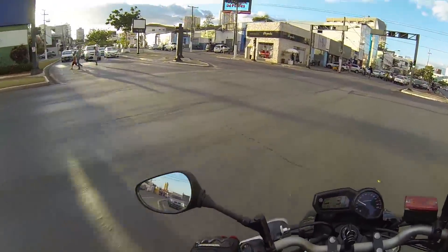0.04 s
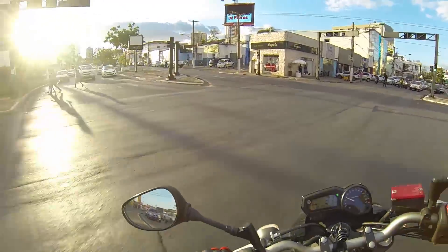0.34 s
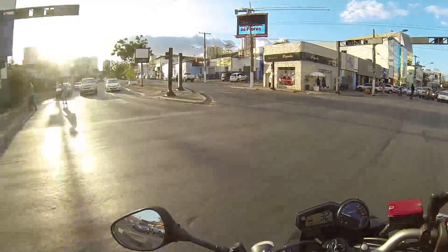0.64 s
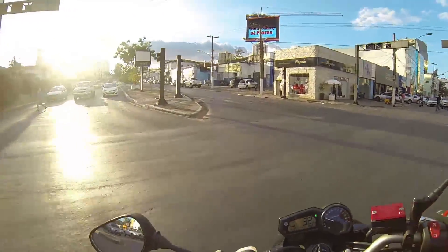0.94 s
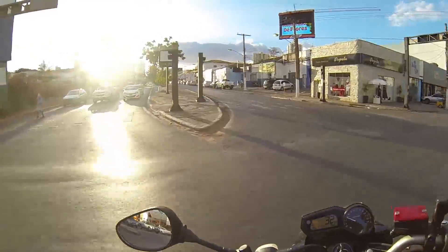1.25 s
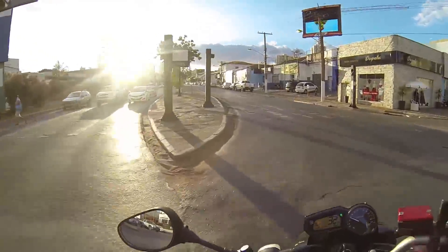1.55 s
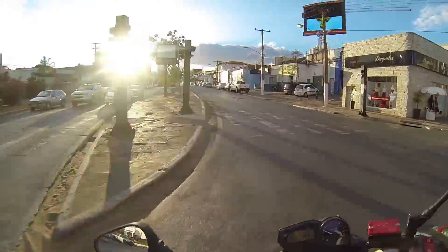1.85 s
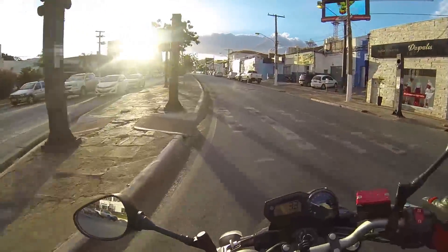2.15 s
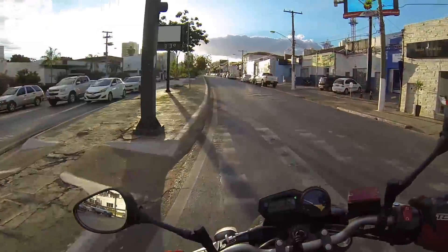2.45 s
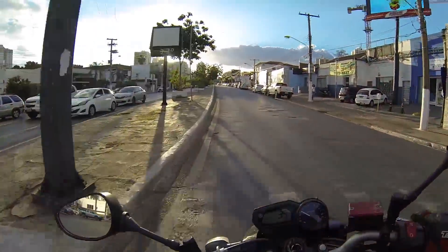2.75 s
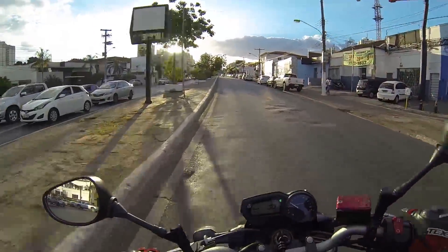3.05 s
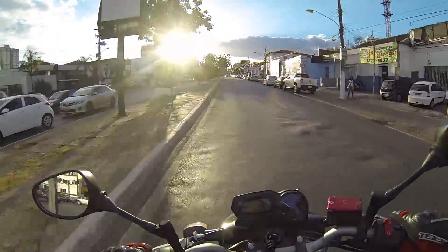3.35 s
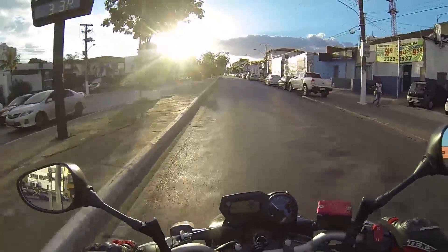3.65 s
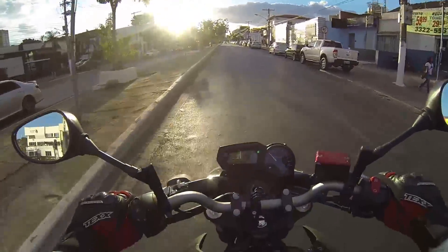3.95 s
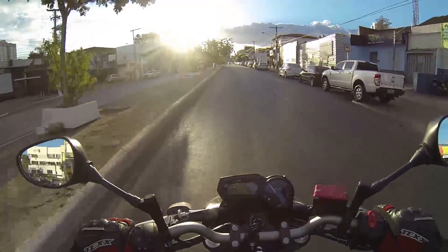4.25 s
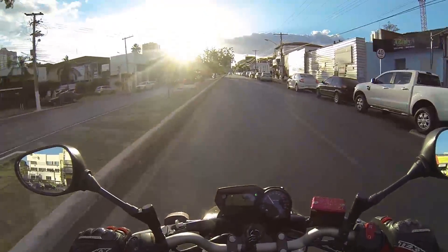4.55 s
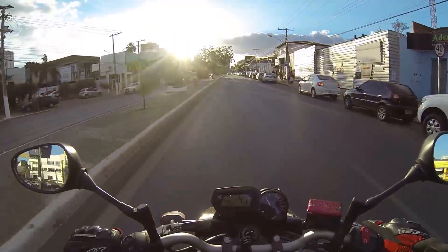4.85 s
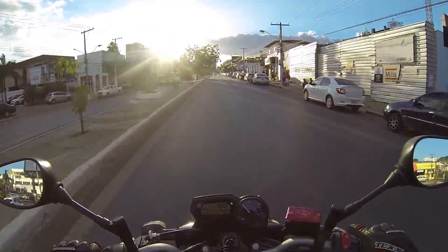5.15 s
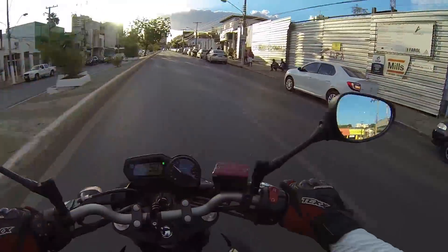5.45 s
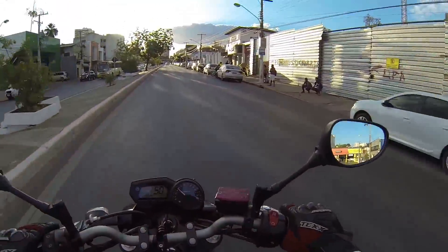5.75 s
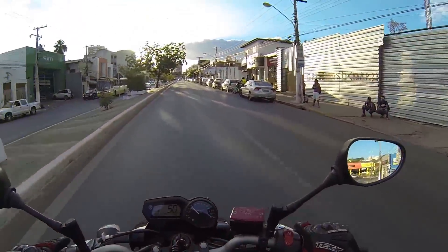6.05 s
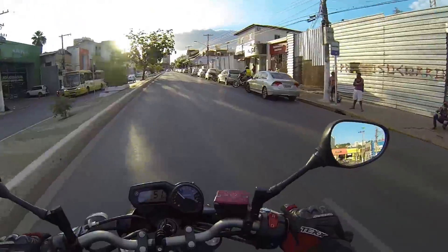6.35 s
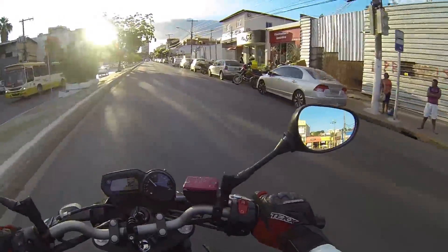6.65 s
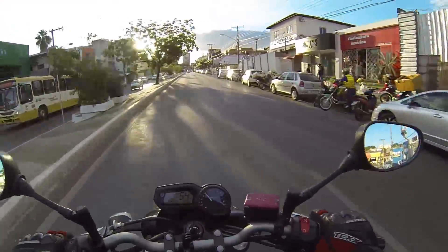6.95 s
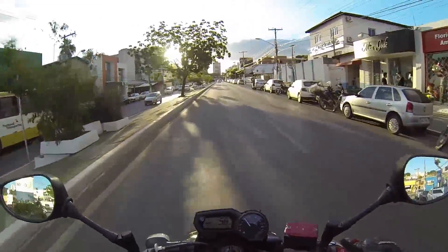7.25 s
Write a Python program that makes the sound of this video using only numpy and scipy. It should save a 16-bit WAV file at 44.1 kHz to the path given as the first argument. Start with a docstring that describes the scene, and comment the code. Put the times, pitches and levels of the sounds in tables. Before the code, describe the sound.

A four-cylinder motorcycle runs along a city street with a low, slightly surging exhaust boom, heard from the rider's helmet. The revs climb steadily and turn raspy, then drop with a pop at an upshift. The engine pulls again before the throttle shuts with another pop. Wind buffets the microphone and hisses throughout, with a few faint rattling ticks.

```python
"""A low exhaust boom, nudged by small jolts, is heard from the helmet of a four-cylinder motorcycle's rider.
The bike accelerates along a street, shifts up near 5 s, pulls again and pops as the throttle shuts.
Each firing is a pressure pulse: the silencer passes a smooth boom, while resonances of the pipes
and airbox give bark, growl and rasp. Valves clatter and meshing gear teeth whine.
Turbulent air buffets the microphone and hisses; the mount rattles and a brake squeals thinly."""
import sys
import numpy as np
from scipy import signal
from scipy.fft import rfft, irfft, next_fast_len
from scipy.io import wavfile
from scipy.ndimage import uniform_filter1d

SR = 44100
rng = np.random.default_rng(int(sys.argv[2]) if len(sys.argv) > 2 else 0)


def dump_mix(stems):
    """Bounce the given channels to the path in sys.argv[1] as a 16-bit WAV at rate SR."""
    frames = np.atleast_2d(stems).T  # one column per channel
    limited = np.clip(frames, -1, 1)  # hard clip at full scale
    pcm = np.round(limited * 32767).astype(np.int16)
    wavfile.write(sys.argv[1], SR, pcm)


N = 330646
T = np.arange(N) / SR

# engine speed through two gears: (time [s], firing rate [Hz])
FIRING_RATE = [(0, 92.96), (0.328, 89.16), (1.791, 92), (2.131, 94.8), (2.793, 103.8), (3.199, 110.1),
               (3.93, 122.9), (4.723, 143.7), (4.87, 144.7), (4.92, 131.9), (5.116, 101.0), (5.251, 100.7),
               (5.311, 115.7), (5.937, 117.4), (6.722, 129.6), (7.138, 136.9), (7.267, 107.2),
               (7.439, 98.9)]
# pull with the throttle open: (time [s], relative exhaust bark [dB], relative intake rasp [dB])
ENGINE_LOAD = [(0.0, -21, -34), (1.9, -20, -34.5), (2.2, -22.5, -32), (3.4, -19, -26), (3.9, -20.5, -25),
               (4.05, -24.5, -25), (4.3, -20.5, -24.5), (4.75, -28.5, -21), (5.3, -21.5, -30),
               (5.7, -23, -31.5), (6.35, -20, -22), (7.1, -23.5, -26.5), (7.5, -30.5, -32)]
# cylinders in firing order: (relative strength deviation [1], pipe delay at a spread of 1 [s])
CYLINDERS = [(1.0, .00012), (0.12, -.00006), (0.52, .00002), (-0.049, -.00012)]
# jolts that wind up the drive train: (time [s], jump in firing rate [Hz])
JOLTS = [(.16, 7), (.525, 2.23), (0.902, 2.63), (.99, 4.4), (1.499, 1.63), (1.86, 1.43), (1.954, 2.46),
         (2.379, 1.8), (2.611, 1.2), (2.878, 2.292), (3.772, 2.47), (5.38, 10.2)]
# throttle shut, to shift up and to slow down: (closing time [s], opening time [s])
COASTS = [(4.866, 5.25), (7.15, 7.7)]
# unburnt fuel igniting in the pipe: (time [s], level [dB])
POPS = [(5.028, -39), (5.066, -26), (5.122, -51), (7.47, -27)]
# wind gusts: (time [s], duration [s], relative rumble [dB], relative flutter [dB])
GUSTS = [(2.099, 0.45, -36, -15.5), (2.81, .15, -21, -33), (4.001, .35, -22, -18), (4.546, 1, -27.5, -22.5),
         (5.215, .6, -19, -26.5), (6.497, 0.44, -28, -23), (7.354, 0.87, -20, -24.5)]
# rushes of air, brief swishes and longer swells of hiss: (time [s], duration [s], level [dB])
RUSHES = [(2.627, 0.086, -49), (3.01, 0.097, -51), (3.15, 0.066, -53), (3.303, 1.54, -55.5),
          (4.661, 0.48, -42), (6.42, .9, -49.5)]
# light rattles of the mount: (time [s], level [dB])
RATTLES = [(.165, -44), (2.005, -46), (2.791, -51), (3.015, -45), (3.39, -48), (3.69, -46), (4.09, -51),
           (5.39, -49), (5.51, -48)]

# responses of the engine's parts: (frequency [Hz], relative level [dB])
SILENCER_RESPONSE = [(90, -15), (115, -15.5), (125, -13.6), (145, -17), (180, -16), (195, -16), (212, -16),
                     (240, -20.5), (270, -24), (290, -29.5)]
PIPE_RESPONSE = [(190, -27), (275, 0.5), (305, 1.5), (355, -8.5), (400, 3.5), (460, 8), (500, 8), (560, 2),
                 (640, -1.5), (720, -8.5), (820, -13), (930, -7), (1020, -20)]
HEADER_RESPONSE = [(420, -26), (530, 8.5), (620, -5), (700, -12.5), (770, -5.5), (840, 1.5), (910, -16)]
AIRBOX_RESPONSE = [(450, -29.5), (700, -3), (800, 0.5), (930, -12), (1050, 0), (1190, 10), (1350, 1.5),
                   (1520, -11.5), (1750, -11), (2150, -13), (2450, -36.5), (2850, -46.5), (3200, -42)]
GEARCASE_RESPONSE = [(4000, -58.5), (4400, -64), (4700, -67), (4870, -69), (5080, -64.5), (5300, -64.5),
                     (5600, -69), (5900, -84)]
# spectra of valve and air noise: (frequency [Hz], relative level [dB])
CLATTER_SPECTRUM = [(400, -7), (1000, 4.5), (1600, -8.5), (2100, -8), (2500, -11.5), (2900, -14.5),
                    (3300, -29), (3950, -21), (4400, -27), (5000, -23.5)]
RUMBLE_SPECTRUM = [(15, -12), (35, -2), (65, 1), (90, 1), (130, -14)]
FLUTTER_SPECTRUM = [(70, -17.5), (110, -1.5), (170, -1.5), (240, -5), (290, -12.5), (380, -18),
                    (700, -28.5)]
HISS_SPECTRUM = [(1500, 1), (3000, 8.5), (3400, 4), (4050, 1.5), (5000, -2.5), (7500, -1), (8000, 3.5),
                 (8500, -3.5), (9200, -1), (9600, -1.5), (11500, -7.5), (15000, -14.5)]
SWISH_SPECTRUM = [(1500, -8), (2700, 4), (4500, 2), (7000, -2), (9000, -3), (10000, 1), (11000, -7),
                  (15000, -10)]

JOLT_RISE_S, JOLT_RING_HZ, JOLT_DECAY_S = .11, 7.6, .11
# level changes with the throttle shut
SHUT_TONE_DB, SHUT_OCTAVE_DB, SHUT_BARK_DB, SHUT_RASP_DB, SHUT_HISS_DB = -5, -13, -7, -15.5, -1.5
# relative levels of the steady wind, which grows as the ride goes on
RUMBLE_DB, FLUTTER_DB, WIND_DB_PER_S = -29, -24, 0.2054
HISS_DB, HISS_DB_PER_S = -48.5, -0.51


def exhaust_boom(turns, hz, revs, shut, lag_s=0.032):
    """Acoustic filtering: the firing tone and its octave sweep through the silencer's response."""
    memory = np.exp(-1 / (lag_s * SR))
    lagged_shut = signal.lfilter([1 - memory], [1, -memory], shut)  # the boom dies later than the bark
    tone_db, octave_db = np.interp([hz, 2 * hz], *np.transpose(SILENCER_RESPONSE))
    waver_db = 1.45 * revs * wander(4.4)
    tone_db += SHUT_TONE_DB * lagged_shut + waver_db + 0.37
    octave_db += SHUT_OCTAVE_DB * shut + 0.3
    angle = 2 * np.pi * turns
    boom = amp(tone_db) * np.cos(angle) + amp(octave_db) * np.cos(2 * angle + 0.14)
    return -np.sqrt(2) * (1 + 0.054 * wander(24)) * boom


def exhaust_bark(turns, revs, shut, bark_db):
    """Pipe resonance: sharp pulses ring the exhaust; off the throttle, turbulence makes it burble."""
    pulses = firings(turns, uneven=0.06 + 0.12 * revs, scatter=0.15, jitter_s=.00003, spread=.5)
    roughness = .09 + .4 * shut
    drive = (1 - roughness) * pulses + roughness * puffs(turns, decay_cycles=0.96, steady=0.23)
    return -amp(bark_db - 1.32) * colour(drive, PIPE_RESPONSE)


def intake_rasp(turns, revs, rasp_db):
    """Cavity resonance: gulps of air ring the airbox, more unevenly as the revs rise."""
    turns = turns + 0.3886  # the gulps fall between the exhaust beats
    drive = firings(turns, uneven=.4 + .55 * revs, scatter=.13, jitter_s=.00002, spread=.7)
    drive += (.36 - .24 * revs) * puffs(turns, decay_cycles=.6, steady=.3)
    return amp(rasp_db - 5.0) * reflected(colour(drive, AIRBOX_RESPONSE), delay_s=0.00426, echo_db=-14)


def header_growl(turns, revs, bark_db):
    """Modulation: two cylinder pairs push in turn in the headers, adding lines between the harmonics."""
    pulses = firings(turns, uneven=.2 * revs, scatter=0.086, jitter_s=.00002, spread=0.36)
    push_pull = pulses * np.cos(np.pi * turns)
    return amp(bark_db - 11) * np.clip(2.0 * revs, .2, 1) * colour(push_pull, HEADER_RESPONSE)


def afterfire(decay_s=0.013):
    """Transient excitation: short bursts of burning gas ring the exhaust pipe."""
    return bursts(POPS, decay_s) * colour(noise(), [(200, -9), (480, 2), (1200, -10), (2500, -26)])


def firings(turns, uneven, scatter, jitter_s, spread):
    """A quasi-periodic pulse train: cylinders and their pipes differ, and no two burns are alike."""
    onsets = np.flatnonzero(np.diff(np.floor(turns)))
    strength_error, timing_error = rng.standard_normal((len(onsets), 2)).T
    imbalance, travel = np.resize(CYLINDERS, (len(onsets), 2)).T
    delay_s = spread * travel + timing_error * jitter_s
    arrivals = np.clip(onsets + np.round(delay_s * SR).astype(int), 0, N - 1)
    pulses = np.zeros(N)
    pulses[arrivals] = 1 + uneven[onsets] * imbalance + scatter * strength_error
    return unit(pulses)


def puffs(turns, decay_cycles, steady):
    """Pulsed turbulence: noise leaps at each firing and decays towards a steady floor."""
    return unit((steady + np.exp(-(turns % 1) / decay_cycles)) * noise())


def drive_train_rocking(time_s, jump_hz):
    """Damped oscillation: a jolt lifts the revs, then the chain and its rubber damper rock to rest."""
    age_s = np.maximum(T - time_s, 0)
    rise = np.where(T < time_s, swell(time_s, 2 * JOLT_RISE_S), 1)
    return jump_hz * rise * np.cos(2 * np.pi * JOLT_RING_HZ * age_s) * np.exp(-age_s / JOLT_DECAY_S)


def throttle_shut(close_s=0.03, open_s=0.058):
    """Throttling of the airflow: 0 under power, 1 coasting; the grip snaps shut and rolls open."""
    return sum(np.clip(np.minimum((T - closes) / close_s, (opens - T) / open_s) + .5, 0, 1)
               for closes, opens in COASTS)


def valve_clatter(turns, load_db):
    """Impact noise: the valves clatter in step with the firings, louder under load."""
    rattle = puffs(turns, decay_cycles=1, steady=0.52)
    return amp(-36.0 + 0.35 * load_db) * colour(rattle, CLATTER_SPECTRUM)


def gear_whine(hz, shut, load_db, spin_up, teeth_per_firing=44):
    """Forced vibration: the primary gear's meshing teeth drive the housing while the throttle is open."""
    mesh_hz = teeth_per_firing * hz
    housing_db = np.interp(mesh_hz, *np.transpose(GEARCASE_RESPONSE))
    bite_db = -6 * np.clip(spin_up / 100, 0, 1)  # the teeth run light while the revs fly up
    whine_db = housing_db + 0.76 * load_db + bite_db + 1.2 * wander(6.6)
    whine = amp(whine_db) * whistle(mesh_hz, width_hz=95)
    subharmonic = amp(-57.0) * whistle(mesh_hz / 2, width_hz=74)
    cover_ring = amp(-62.5 + 0.24 * load_db) * whistle(2920, width_hz=53)
    snarl = amp(-62.0 + 1.03 * load_db) * whistle(2100, width_hz=130)  # an edge at full throttle
    return (1 - shut) * (whine + subharmonic + cover_ring + snarl)


def wind_buffeting():
    """Turbulent pressure at the microphone: airstream and gusts are incoherent, so their powers add."""
    power = amp(np.array([[RUMBLE_DB], [FLUTTER_DB]]) + WIND_DB_PER_S * T) ** 2
    for time_s, length_s, gust_rumble_db, gust_flutter_db in GUSTS:
        power += amp([[gust_rumble_db], [gust_flutter_db]]) ** 2 * swell(time_s, length_s)
    rumble_db, flutter_db = 10 * np.log10(power)
    rumble = amp(rumble_db + 2.3 + 0.34 * wander(18)) * colour(noise(), RUMBLE_SPECTRUM)
    flutter = amp(flutter_db - 2.2 + 0.4 * wander(14)) * colour(noise(), FLUTTER_SPECTRUM)
    return rumble + flutter


def air_hiss(shut):
    """Broadband flow noise: the hiss of air and tyres slowly recedes, with swishes and longer swells."""
    hiss_db = HISS_DB + HISS_DB_PER_S * T + SHUT_HISS_DB * shut + .5 * wander(40)
    hiss = amp(hiss_db) * colour(noise(), HISS_SPECTRUM)
    rushes = sum(amp(db) * swell(time_s, length_s) for time_s, length_s, db in RUSHES)
    return hiss + rushes * amp(1.5 * wander(60)) * colour(noise(), SWISH_SPECTRUM)


def mount_rattles(decay_s=.008):
    """Damped impacts: the mount gives light, bright ticks."""
    bright_noise = colour(noise(), [(2000, -24), (6000, 8), (10000, 9), (14000, -23)])
    return bursts(RATTLES, decay_s) * bright_noise


def sizzle():
    """Band-limited noise: a brief, very high sizzle near the start."""
    return amp(-55) * swell(.28, 0.14) * whistle(14700, width_hz=1200)


def brake_squeal():
    """Friction-driven vibration: a thin squeal falls in pitch as the bike slows."""
    pitch_hz = np.interp(T, [7.3, 7.5], [12400, 11850])
    return amp(-61) * swell(7.44, 0.32) * whistle(pitch_hz, width_hz=130)


def reflected(x, delay_s, echo_db):
    """Comb filtering: one short reflection makes overtones wax and wane as the revs sweep."""
    return unit(x + amp(echo_db) * np.interp(T - delay_s, T, x, left=0))


def colour(x, points, size=8192):
    """Minimum-phase filtering by a spectrum that falls steeply above its last point; output rms is 1."""
    hz, db = np.transpose(points)
    f = np.fft.rfftfreq(size, 1 / SR) + 1
    gain = amp(np.interp(np.log(f), np.log(hz), db)) * np.minimum(hz[-1] / f, 1) ** 2
    cepstrum = irfft(np.log(gain))
    cepstrum[1:size // 2] *= 2  # folding the cepstrum makes the filter causal
    cepstrum[size // 2 + 1:] = 0
    impulse_response = irfft(np.exp(rfft(cepstrum)))[:size // 2]
    return unit(signal.oaconvolve(x, impulse_response)[:N])


def whistle(hz, width_hz):
    """Quadrature modulation: a narrow band of noise follows a pitch."""
    angle = 2 * np.pi * np.cumsum(hz * np.ones(N)) / SR
    return unit(wander(width_hz) * np.cos(angle) + wander(width_hz) * np.sin(angle))


def wander(rate_hz):
    """Low-pass noise: a random fluctuation of rms 1, up to about this rate."""
    size = next_fast_len(N)
    rolloff = np.exp(-(np.fft.rfftfreq(size, 1 / SR) / rate_hz) ** 2)
    return unit(irfft(rfft(rng.standard_normal(size)) * rolloff, size)[:N])


def noise():
    """Gaussian white noise."""
    return rng.standard_normal(N)


def bursts(events, decay_s):
    """Exponential decay after each sudden onset."""
    return sum(amp(db) * (T > time_s) * np.exp(-abs(T - time_s) / decay_s) for time_s, db in events)


def swell(centre_s, length_s):
    """A raised-cosine envelope around a moment."""
    return np.cos(np.pi * np.clip((T - centre_s) / length_s, -.5, .5)) ** 2


def curves(rows):
    """Linear interpolation of a table's columns over time."""
    times, *columns = np.transpose(rows)
    return [np.interp(T, times, column) for column in columns]


def amp(db):
    """Decibels to amplitude ratio."""
    return 10 ** (np.asarray(db) / 20)


def unit(x):
    """Normalisation to rms 1."""
    return x / np.sqrt(np.mean(x ** 2) + 1e-20)


def scene():
    """Superposition: the sources ride with the microphone, so both channels are nearly alike."""
    hz = curves(FIRING_RATE)[0] + sum(drive_train_rocking(*jolt) for jolt in JOLTS)
    hz *= 1 + .0035 * wander(14)  # the crank never turns quite evenly
    turns = np.cumsum(hz) / SR  # phase, one cycle per firing
    revs = np.clip((hz - 90) / 55, 0, 1)  # 0 when cruising, 1 at the top of the gear
    spin_up = uniform_filter1d(np.gradient(hz) * SR, size=4000)  # [Hz/s]
    shut = throttle_shut()
    bark_db, rasp_db = curves(ENGINE_LOAD)
    bark_db += SHUT_BARK_DB * shut
    rasp_db += SHUT_RASP_DB * shut
    load_db = rasp_db + 36
    # at low revs each nudge of throttle barks
    surge_db = 1.2 * np.tanh(spin_up / 30) * np.clip(1 - 4 * revs, 0, 1) * (1 - shut)
    mix = exhaust_boom(turns, hz, revs, shut) + exhaust_bark(turns, revs, shut, bark_db + surge_db)
    mix += intake_rasp(turns, revs, rasp_db + surge_db)
    mix += header_growl(turns, revs, bark_db) + afterfire()
    mix += wind_buffeting() + air_hiss(shut)
    mix += valve_clatter(turns, load_db) + gear_whine(hz, shut, load_db, spin_up)
    mix += mount_rattles() + sizzle() + brake_squeal()
    side = amp(-48.5) * colour(noise(), RUMBLE_SPECTRUM)  # a trace of rumble differs between the ears
    return np.array([mix - side, mix + side])


def record(dry):
    """Band limiting: a steep low-pass cuts the top treble, and both ends fade briefly."""
    cutoff_hz, fade_s = 15300, .003
    low_pass = signal.firwin(1023, cutoff_hz, window=("kaiser", 9), fs=SR)
    fade = np.minimum(np.minimum(T, T[::-1]) / fade_s, 1)
    return signal.oaconvolve(dry, low_pass[None], "same", axes=1) * fade


dry = scene()
out = record(dry)
dump_mix(out)
```